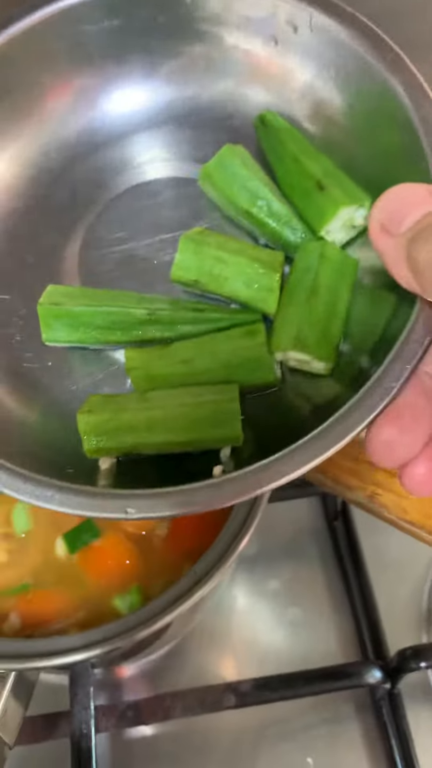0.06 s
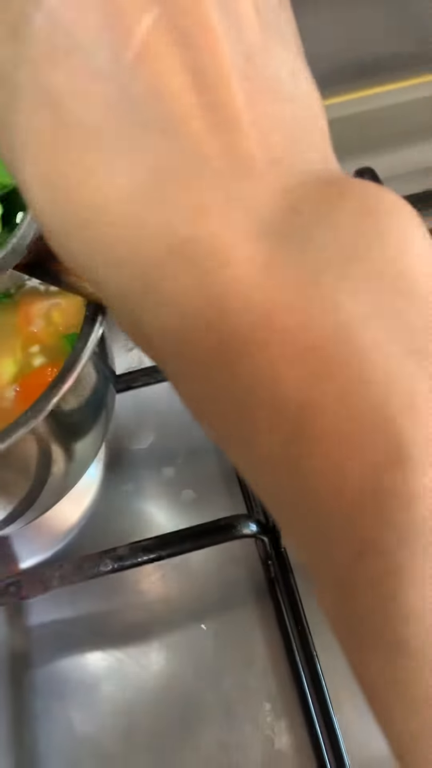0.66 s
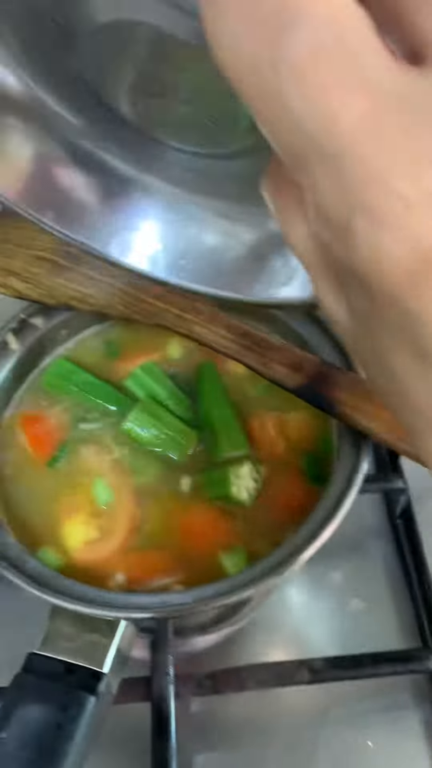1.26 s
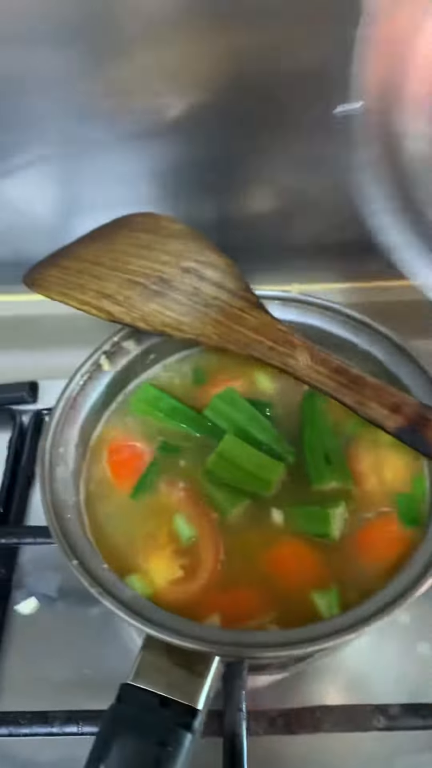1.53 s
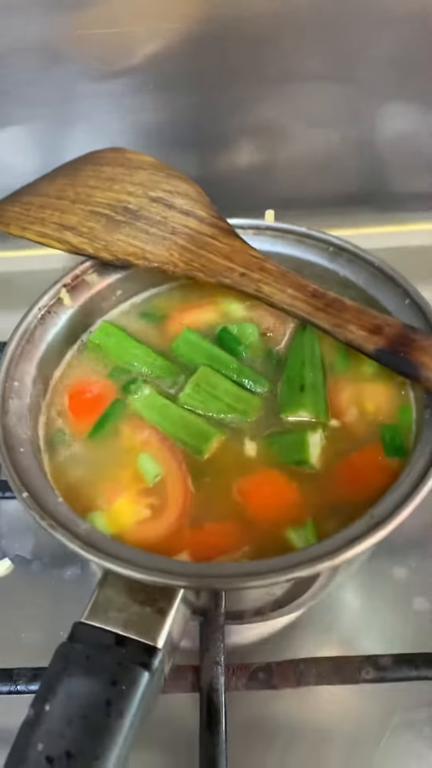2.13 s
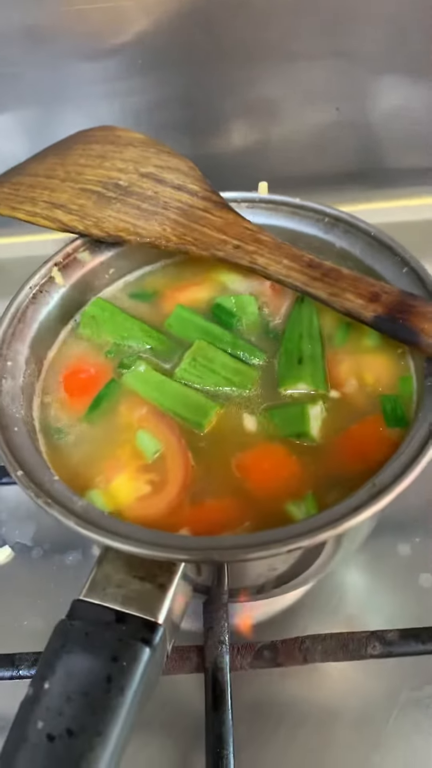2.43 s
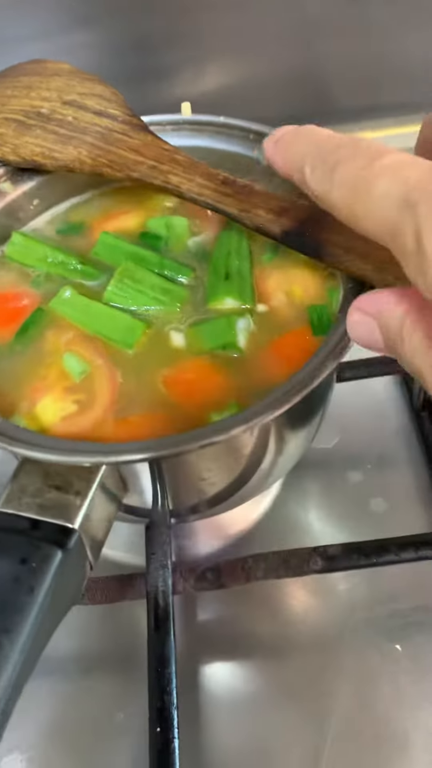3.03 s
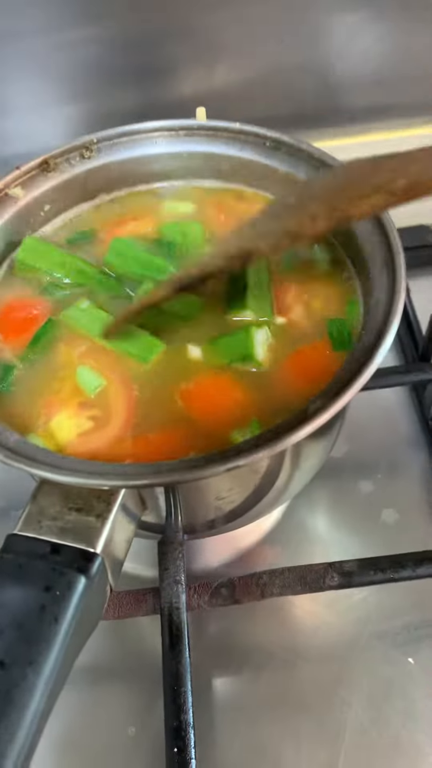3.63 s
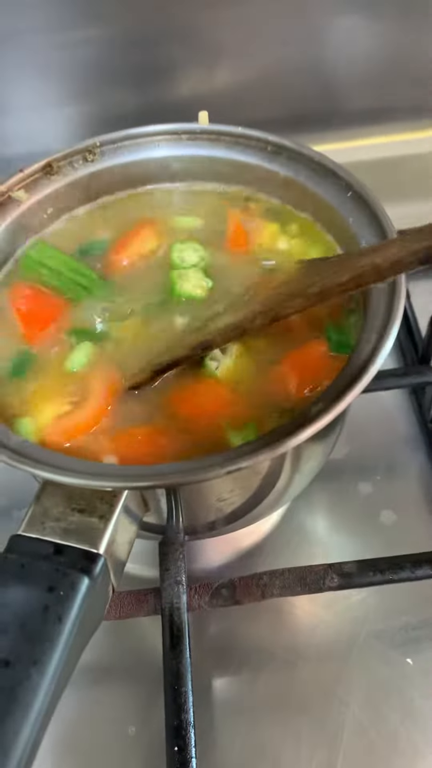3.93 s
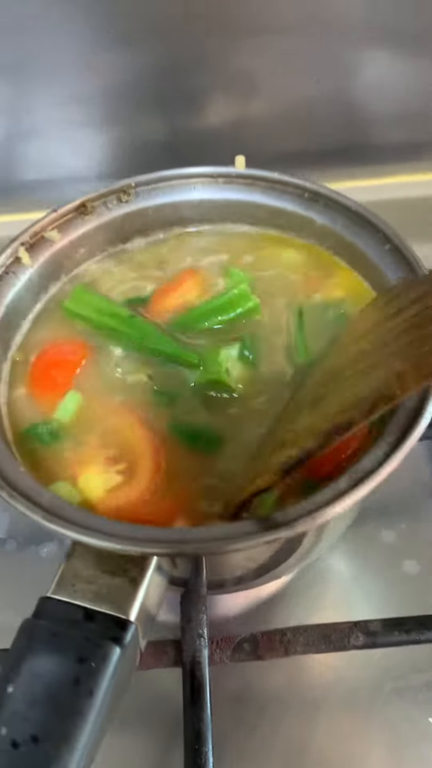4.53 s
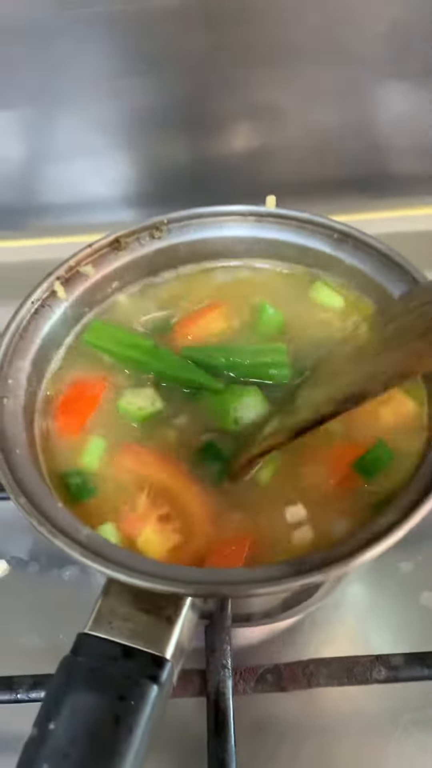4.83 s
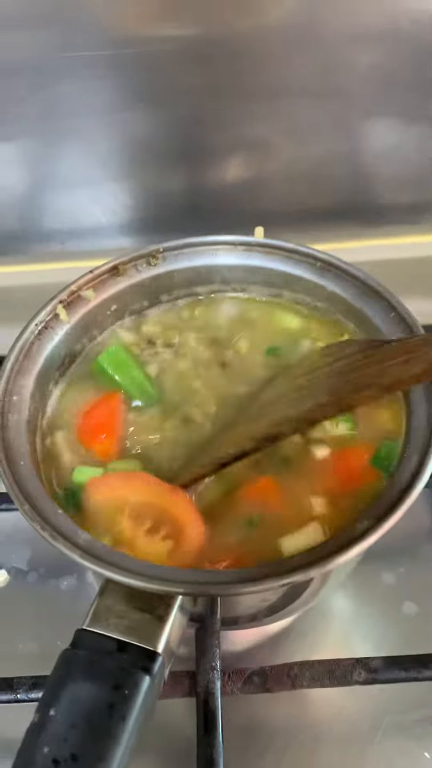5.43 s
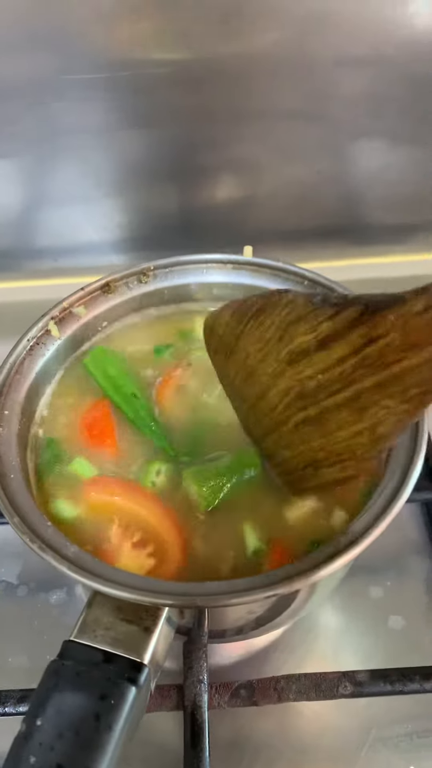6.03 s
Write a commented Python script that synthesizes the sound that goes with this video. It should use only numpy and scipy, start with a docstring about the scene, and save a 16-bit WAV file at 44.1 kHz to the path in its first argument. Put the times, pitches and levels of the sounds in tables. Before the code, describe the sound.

Okra plops into soup over a hissing gas flame, followed by a ringing steel bowl clank, gentle stirring and ticking bubbles.

```python
"""Soup simmers on a hissing gas burner in a small kitchen, over a low flame roar and a fan's hum.
In the first second okra slides from a steel bowl, knocks on it and plops in; drops sizzle.
At 2.2 s the empty bowl is put down on the counter with a ringing double clank.
From 3.5 s a wooden spatula stirs softly and the soup fizzes; tiny bubbles tick throughout."""
import sys
import numpy as np
from scipy import signal
from scipy.fft import rfft, irfft, next_fast_len
from scipy.io import wavfile

SR = 44100
rng = np.random.default_rng(int(sys.argv[2]) if len(sys.argv) > 2 else 0)


def waveform_to_disk(signal):
    """Save audio, clipped to [-1, 1], as 16-bit WAV at the path in sys.argv[1]."""
    frames = np.transpose(np.atleast_2d(signal))
    scaled = np.clip(frames, -1, 1) * 32767
    samples = np.round(scaled).astype(np.int16)
    wavfile.write(sys.argv[1], SR, samples)


N = 277036
T, HZ = np.arange(N) / SR, np.fft.rfftfreq(N, 1 / SR)

# steel bowl modes; the last two give the hard knock
# pitch_hz, t60_s, rim_db, wall_db, base_db, left_minus_right_db
BOWL_MODES = [(597, 0.3, -20, -42, -24, -1), (638, 0.23, -44, -27, -17, -5), (838, 0.4, -24, -46, -40, -4),
              (897, 0.3, -30, -42, -20, 0), (990, 0.25, -32, -36, -18.5, -3),
              (1103, 0.24, -36, -19.5, -20.5, 0), (1378, 0.5, -40, -29, -30, 0),
              (1451, 0.22, -34, -42, -30, 0), (1514, 0.3, -34, -42, -22, -2),
              (1844, 0.35, -42, -42, -31, 0), (2105, 0.12, -34, -21, -31, 1),
              (2926, 0.26, -31, -42, -36, -1), (2987, 0.33, -30.5, -46, -50, -4),
              (3090, 0.33, -33.5, -44, -50, 0), (4340, 0.3, -42, -40, -22.5, 8),
              (4670, 0.22, -30, -46, -32, -2), (4788, 0.2, -17.5, -44, -42, -4),
              (5555, 0.1, -29, -50, -33, 0), (7183, 0.2, -29, -42, -38, 1), (8102, 0.13, -24, -44, -33, 0),
              (8735, 0.11, -24, -38, -24.5, 0), (9100, 0.16, -31, -36, -31, 0),
              (10410, 0.19, -26.5, -38, -30, -2), (12550, 0.15, -29, -42, -30, 0),
              (1040, 0.035, -23, -32, -8, -2), (1480, 0.045, -18, -36, -15, 0)]
# strike places, in column order: rim, wall, base
STRIKE_PLACES = ["rim", "wall", "base"]


def amp(db):
    """Decibels to gain."""
    return 10 ** (np.asarray(db) / 20)


def unit(x):
    """Scale to rms 1."""
    return x / np.sqrt(np.mean(x ** 2) + 1e-20)


def curve_at(points, hz):
    """Interpolate on a log-frequency axis."""
    f, value = np.transpose(points)
    return np.interp(np.log(hz + 1), np.log(f), value)


def add(mix, start_s, sound):
    """Mix a sound in at start_s."""
    part = mix[:, max(round(start_s * SR), 0):][:, :sound.shape[-1]]
    part += sound[..., :part.shape[1]]


def peak(f, hz, width_hz):
    """Gain of one resonance."""
    return 1 / np.sqrt(1 + ((f ** 2 - hz ** 2) / (width_hz * f + 1e-9)) ** 2)


def drift(rate_hz, size=N):
    """Slow random motion, rms 1."""
    knots = np.arange(0, size / SR + 1, 1 / rate_hz)
    return unit(np.interp(T[:size], knots, rng.standard_normal(len(knots))))


def noise(gain, size=N):
    """Two independent noises, rms 1, with spectrum gain(hz)."""
    n = next_fast_len(size, real=True)
    white = rfft(rng.standard_normal((2, n)))
    return unit(irfft(white * gain(np.fft.rfftfreq(n, 1 / SR)), n)[:, :size])


def dying_noise(gain, t60_curve):
    """0.5 s of shaped noise, each band decaying at its own rate."""
    hz, t, bands = signal.stft(noise(gain, SR // 2), SR, nperseg=256)
    decay = amp(-60 * t / curve_at(t60_curve, hz)[:, None])
    return signal.istft(bands * decay, SR, nperseg=256)[1][:, :SR // 2]


def fuzzy_tone(hz, width_hz):
    """Two independent noises, rms 1, in one resonance; hz may vary in time."""
    real, imaginary = rng.standard_normal((2, 2, N))
    blur = signal.lfilter([1], [1, -np.exp(-np.pi * width_hz / SR)], real + 1j * imaginary)
    turns = np.cumsum(hz * np.ones(N)) / SR
    return unit((blur * np.exp(2j * np.pi * turns)).real)


def kitchen(x, rise_s=0.0056):
    """Dense reflections off tiles and steel; the top treble dies first."""
    # freq_hz, t60_s
    room_decay = [(100, 0.36), (600, 0.13), (3000, 0.45), (8000, 0.27), (15000, 0.029)]
    tail = dying_noise(np.ones_like, room_decay) * (1 - np.exp(-T[:SR // 2] / rise_s))
    return signal.fftconvolve(x, tail / np.linalg.norm(tail[0]), axes=1)[:, :N]


def steel_echoes(x, echo_db=-4, spread_s=0.02, count=24):
    """Early echoes off pan, hob and splashback comb the sound finely."""
    response = np.zeros((2, SR // 10))
    response[:, 0] = 1
    for side in response:
        delay_s = 0.001 + spread_s * rng.random(count)
        side[(delay_s * SR).astype(int)] = rng.choice([-1, 1], count) * amp(echo_db) / np.sqrt(count)
    return signal.oaconvolve(x, response / np.linalg.norm(response[0]), axes=1)[:, :N]


def fan_hum():
    """A fan's rough hum: two narrow noise bands."""
    # pitch_hz, width_hz, level_db
    bands = [(119.9, 5.3, -49.5), (277.3, 42, -52.5)]
    return sum(amp(db) * noise(lambda f: peak(f, hz, width_hz) ** 2) for hz, width_hz, db in bands)


def flame_roar(level_db=-41, throb_db=1, cutoff_hz=1500):
    """Low, throbbing roar of flame and kitchen."""
    # freq_hz, density_db
    spectrum = [(22, -38), (40, -6.5), (62, 1), (100, 3), (160, -2), (220, -9.5), (330, -12.5), (450, -14),
                (620, -16.5), (900, -17), (1300, -20)]
    roar = noise(lambda f: amp(curve_at(spectrum, f)) / (1 + (f / cutoff_hz) ** 4))
    return roar * amp(level_db + throb_db * drift(30))


def pan_ring(pitch_hz=3025, width_hz=25, start_db=-64, growth_db_per_s=1.5):
    """The flame keeps the pan wall faintly ringing, louder as it heats."""
    return fuzzy_tone(pitch_hz, width_hz) * amp(start_db + growth_db_per_s * T)


def screening(fade_s=0.15):
    """Level shifts of the burner's note and hiss as bowl, arm and hand pass in front."""
    # start_s, length_s, note_db, hiss_db
    passes = [(-0.4, 0.8, 0.5, -2), (0.14, 1.1, -4, 1.7), (1.05, 0.52, -1, 0), (2.9, 0.59, -4, 0.7)]
    shift_db = np.zeros((2, N))
    for start_s, length_s, note_db, hiss_db in passes:
        cover = np.clip(np.minimum(T - start_s, start_s + length_s - T) / fade_s, 0, 1)
        shift_db += np.outer([note_db, hiss_db], cover)
    return shift_db


def burner_hiss(hiss_shift_db, note_shift_db, level_db=-41.5, flutter_db=1.24, waver=0.003):
    """The gas jet hisses through the burner's resonances, each wavering on its own."""
    # freq_hz, density_db
    spectrum = [(300, -25), (700, -69), (1300, -14.5), (2600, -22), (3600, -19.5), (5500, -45), (8600, -22),
                (11900, -45), (14400, -54), (15600, -27)]
    # pitch_hz, width_hz, density_db
    resonances = [(1333, 55, -13.5), (1482, 50, -10.5), (1725, 210, -9), (2457, 71, -9.5), (4325, 70, -7.7),
                  (4560, 240, -9.8), (6790, 320, -7), (9080, 220, -18), (10450, 300, -12.3),
                  (13180, 240, -12)]
    hiss = noise(lambda f: amp(curve_at(spectrum, f)))
    hiss_power = np.mean(amp(curve_at(spectrum, HZ)) ** 2)
    for hz, width_hz, db in resonances:
        share = np.sqrt(np.mean(peak(HZ, hz, width_hz) ** 2) / hiss_power)
        wander_db = 1.2 * drift(12)
        tone = fuzzy_tone(hz * (1 + waver * drift(20)), width_hz)
        hiss += tone * share * amp(db + wander_db + note_shift_db / 2)
    return unit(hiss) * amp(level_db + hiss_shift_db + flutter_db * drift(50))


def burner_note(shift_db, start_db=-43, growth_db_per_s=0.7749, width_hz=150, waver_hz=20, swell_db=0.5):
    """The burner's main resonance sings a fuzzy, wavering note that slowly grows."""
    # time_s, pitch_hz
    pitch_path = [(0.0, 1907), (0.234, 1966), (1.001, 2000), (1.251, 2106), (1.701, 2046), (2.152, 1977),
                  (3.969, 1948), (6.28, 2016)]
    time_s, pitch_hz = np.transpose(pitch_path)
    centre_hz = np.mean(pitch_hz)
    offset_hz = np.interp(T, time_s, pitch_hz) - centre_hz + waver_hz * drift(25)
    band = noise(lambda f: peak(f, centre_hz, width_hz) ** 1.35)
    analytic = signal.hilbert(band, next_fast_len(N))[:, :N]
    note = (analytic * np.exp(2j * np.pi * np.cumsum(offset_hz) / SR)).real
    return note * amp(start_db + growth_db_per_s * T + shift_db + swell_db * drift(4.34))


def swells(rows, width_ratio, grain_db):
    """Soft, grainy swells of band noise."""
    out = np.zeros((2, N))
    for start_s, length_s, db, hz in rows:
        n = round(length_s * SR)
        wash = noise(lambda f: peak(f, hz, hz * width_ratio) ** 2, SR)[:, :n]
        grain = amp(grain_db * drift(110, n))
        add(out, start_s, amp(db) * wash * grain * signal.windows.tukey(n, 0.8))
    return out


def sizzle():
    """Drops sizzle on hot metal."""
    # start_s, length_s, level_db, centre_hz
    drops = [(.52, 0.23, -47, 6100), (3.75, 1, -58.5, 9600)]
    return swells(drops, width_ratio=0.16, grain_db=5.5)


def spatula():
    """A wooden spatula sloshes through the soup."""
    # start_s, length_s, level_db, centre_hz
    strokes = [(3.55, 0.26, -51.5, 1190), (3.85, 0.27, -53.5, 620), (6.08, 0.26, -50.5, 555)]
    return swells(strokes, width_ratio=0.27, grain_db=4)


def bubbles_per_s(calm_per_s=14, rise_s=0.44):
    """Okra, then spatula, set the soup fizzing; it settles after each."""
    # start_s, peak_extra_per_s
    disturbances = [(0.9, 55), (3.7, 170)]
    rate = np.full(N, float(calm_per_s))
    for start_s, extra_per_s in disturbances:
        age = np.maximum(T - start_s, 0) / rise_s
        rate += extra_per_s * (age * np.exp(1 - age)) ** 2
    return rate


def simmer(trim_db=-3, t60_s=0.0095, fizz_db=-45, spread_db=2.6, width_hz=2300):
    """Bubbles burst at the pan wall: a few clear ticks among many faint ones."""
    # start_s, level_db
    clear_ticks = [(1.8896, -30), (2.0041, -31), (4.1421, -42), (4.188, -43), (4.3716, -36), (4.4145, -39),
                   (4.467, -33), (4.6972, -33), (4.7046, -33), (4.7851, -33), (4.9832, -37),
                   (5.4142, -28.5)]
    out, t = np.zeros((2, N)), T[:1024]
    faint_s = T[rng.random(N) < bubbles_per_s() / SR]
    faint_db = fizz_db + spread_db * np.minimum(rng.exponential(1, N)[:len(faint_s)], 3)
    for start_s, db in [*clear_ticks, *zip(faint_s, faint_db)]:
        hz = rng.uniform(7200, 10600)
        burst = noise(lambda f: peak(f, hz, width_hz) ** 2, len(t))
        add(out, start_s, burst * amp(db + trim_db - 60 * t / t60_s))
    return out


def pod_taps():
    """The pods' hard ends click dryly on steel."""
    # start_s, level_db, centre_hz, width_hz, t60_s
    taps = [(0.9135, -34, 2900, 300, 0.036), (1.0435, -27.5, 7500, 5000, 0.02),
            (1.0446, -33, 1800, 1800, 0.04)]
    out, t = np.zeros((2, N)), T[:SR // 10]
    for start_s, db, hz, width_hz, t60_s in taps:
        click = noise(lambda f: peak(f, hz, width_hz), len(t))
        add(out, start_s, click * amp(db - 60 * t / t60_s))
    return out


def held_bowl(cutoff_hz=900, fingers_db_per_s=110, rise_s=0.002):
    """Soft pods knock the tilted, hand-held bowl and wake only its lowest modes."""
    # start_s, place, level_db
    knocks = [(0.744, "rim", -18), (0.843, "rim", -9), (0.913, "wall", -6), (0.919, "rim", -9.5)]
    out, t = np.zeros((2, N)), T[:SR // 2]
    hz, t60_s, *place_db, _ = np.transpose(BOWL_MODES)[:, :, None]
    envelope = amp(-60 * t / t60_s - fingers_db_per_s * t) * (1 - np.exp(-t / rise_s))
    modes = envelope * np.sin(2 * np.pi * hz * t) / (1 + (hz / cutoff_hz) ** 4)
    for start_s, place, db in knocks:
        strength = amp(db + place_db[STRIKE_PLACES.index(place)])
        add(out, start_s, (strength * modes).sum(0))
    return out


def okra_plops(splash_t60_s=0.15, width_ratio=0.71, spatter_db=3, wobble=0.016):
    """Each piece gives a spattering slap and the short, unsteady ring of an air pocket."""
    # start_s, ring_db, ring_hz, ring_t60_s, splash_db, splash_hz
    plops = [(0.062, -38, 709, 0.15, -36.5, 557), (0.176, -37, 330, 0.2, -47, 330),
             (0.223, -28, 266.5, 0.075, -45, 400), (0.913, -26.5, 393, 0.056, -37, 706)]
    out, t = np.zeros((2, N)), T[:SR // 3]
    for start_s, ring_db, ring_hz, t60_s, splash_db, splash_hz in plops:
        turns = np.cumsum(ring_hz * (1 + wobble * drift(180, len(t)))) / SR
        ring = np.sin(2 * np.pi * turns) * amp(ring_db - 60 * t / t60_s) * (1 - np.exp(-t * ring_hz))
        slap = noise(lambda f: peak(f, splash_hz, splash_hz * width_ratio), len(t))
        slap *= amp(splash_db - 60 * t / splash_t60_s)
        add(out, start_s, (ring + slap) * amp(spatter_db * drift(310, len(t))))
    return out


def clatter_spectrum(ripple_db=4, spacing_hz=70, low_cut_hz=120):
    """Gain(hz) of steel clattering on the counter, rippled by the bowl's countless small modes."""
    # freq_hz, density_db
    spectrum = [(200, 7.5), (450, -5), (650, -5), (1050, 2), (1600, -2.5), (2500, -9), (3700, -18),
                (4600, -4.5), (5700, -12), (7200, -5.5), (8600, -6), (10500, 0), (12500, -3.5), (15000, -4)]
    hz = np.arange(0, SR / 2, spacing_hz)
    modes_db = ripple_db * np.clip(rng.standard_normal(len(hz)), -2, 2) * np.minimum(hz / 4000, 1)

    def gain(f):
        db = curve_at(spectrum, f) + np.interp(f, hz, modes_db)
        return amp(db) / (1 + (low_cut_hz / (f + 1)) ** 4)
    return gain


def counter_thud(t, rise_s=0.0092):
    """The struck worktop booms in its low modes."""
    # pitch_hz, t60_s, level_db
    modes = [(82.3, 0.34, -1.5), (116.7, 0.12, 5), (197.7, 0.23, -8)]
    boom = sum(amp(db - 60 * t / t60_s) * np.sin(2 * np.pi * hz * t) for hz, t60_s, db in modes)
    return boom * (1 - np.exp(-t / rise_s))


def bowl_clanks(trim_db=1, rise_s=0.0006, beat_hz=30, twin_gain=0.65,
                damping_db=-5, contact_db_per_s=70, rattle_db=1.8):
    """The bowl lands and rocks: each hit damps the last ring, then rings, clatters and thuds anew."""
    # start_s, place, ring_db, clatter_db, tilt_db_per_octave, thud_db
    landings = [(2.1904, "rim", 2, -10.5, 1, -19.5), (2.2364, "rim", -5, -21.5, 1.5, -21),
                (2.3202, "wall", -3, -20.5, 1, -31), (2.345, "wall", -19, -36, 5, -30),
                (2.3651, "base", -0.5, -8.5, 2.5, -20.5), (2.4301, "base", -7.5, -26, 0.5, -39)]
    # freq_hz, t60_s
    clatter_decay = [(300, 0.22), (1200, 0.053), (3000, 0.2), (9000, 0.08)]
    ringing, knocks, t = np.zeros((2, N)), np.zeros((2, N)), T[:SR // 2]
    hz, t60_s, *place_db, balance_db = np.transpose(BOWL_MODES)[:, :, None]
    lobes = amp(np.minimum([balance_db, -balance_db], 0))  # modes radiate more weakly to one side
    decay = amp(-60 * t / t60_s - contact_db_per_s * t)
    attack = 1 - np.exp(-t / rise_s)
    clatter_gain, thud = clatter_spectrum(), counter_thud(t)
    for start_s, place, ring_db, clatter_db, tilt_db_per_octave, thud_db in landings:
        tilt = lambda f: amp(tilt_db_per_octave * np.log2((f + 300) / 3000))
        strength = amp(ring_db + trim_db + place_db[STRIKE_PLACES.index(place)]) * tilt(hz) * lobes
        # not quite round: each mode beats with a twin
        phase, twin_phase, split = rng.random((3, len(BOWL_MODES), 1))
        twin_hz = hz + beat_hz * (split + 0.5) * np.sqrt(hz / 2000)
        modes = np.sin(2 * np.pi * (hz * t + phase))
        twins = twin_gain * np.sin(2 * np.pi * (twin_hz * t + twin_phase))
        rattle = amp(rattle_db * drift(495, len(t)))
        ringing *= amp(np.interp(T, [start_s, start_s + 0.011], [0, damping_db]))
        add(ringing, start_s, (strength * decay * (modes + twins)).sum(1) * attack * rattle)
        clatter = dying_noise(lambda f: clatter_gain(f) * tilt(f), clatter_decay)
        add(knocks, start_s, clatter * amp(clatter_db) * attack * rattle + thud * amp(thud_db))
    return ringing + knocks


def scene(bowl_room_db=-9, pan_room_db=-12):
    """Steady stove plus handling; sounds at the pan are closer and drier than the clanks."""
    clanks = bowl_clanks()
    at_pan = okra_plops() + held_bowl() + simmer()
    liquid = spatula() + sizzle()
    note_shift_db, hiss_shift_db = screening()
    stove = steel_echoes(burner_hiss(hiss_shift_db, note_shift_db) + liquid)
    stove += burner_note(note_shift_db) + pan_ring() + flame_roar()
    direct = stove + fan_hum() + clanks + at_pan + pod_taps()
    return direct + kitchen(amp(bowl_room_db) * clanks + amp(pan_room_db) * at_pan)


def record(dry, cutoff_hz=15850):
    """Two close microphone ports hear much the same sound, the left leading in the treble; low-pass."""
    # freq_hz, coherence
    likeness = [(100, .99), (300, .92), (700, .45), (1100, .4), (1600, .86), (2200, .86), (3300, .25),
                (4500, .8), (6000, .7), (8000, .96), (14000, .94)]
    # freq_hz, left_lead_rad
    lead = [(80, -.1), (500, -.2), (1050, -.1), (1350, .4), (2100, .1), (2500, 1.1), (4300, 2.2),
            (7700, 6.1), (9400, 6.4), (11800, 9.1), (13600, 10), (15000, 12.3)]
    # freq_hz, left_minus_right_db
    balance = [(60, -1.5), (200, -3.5), (600, -5.5), (1400, -2), (2400, -1), (5000, 0)]
    first, second = rfft(dry)
    coherence = curve_at(likeness, HZ)
    side_gain = amp(curve_at(balance, HZ) / 2)
    left = first * side_gain
    blend = coherence * first + 1j * np.sqrt(1 - coherence ** 2) * second
    right = blend * np.exp(-1j * curve_at(lead, HZ)) / side_gain
    low_pass = signal.firwin(511, cutoff_hz, window=("kaiser", 9), fs=SR)
    return signal.oaconvolve(irfft(np.array([left, right]), N), low_pass[None], "same", axes=1)


dry = scene()
out = record(dry)
waveform_to_disk(out)
```